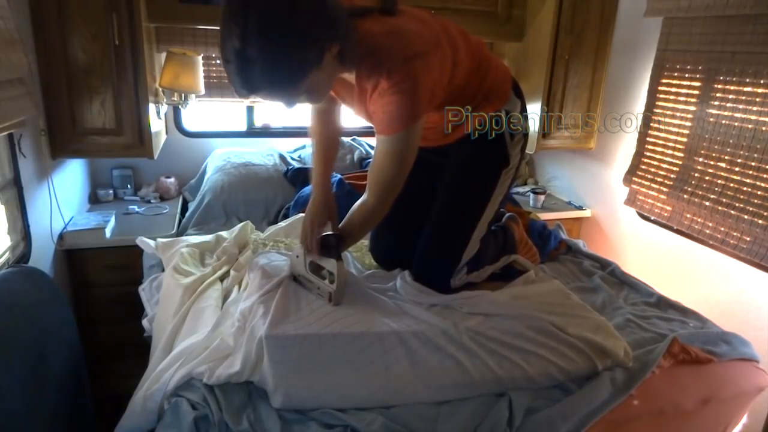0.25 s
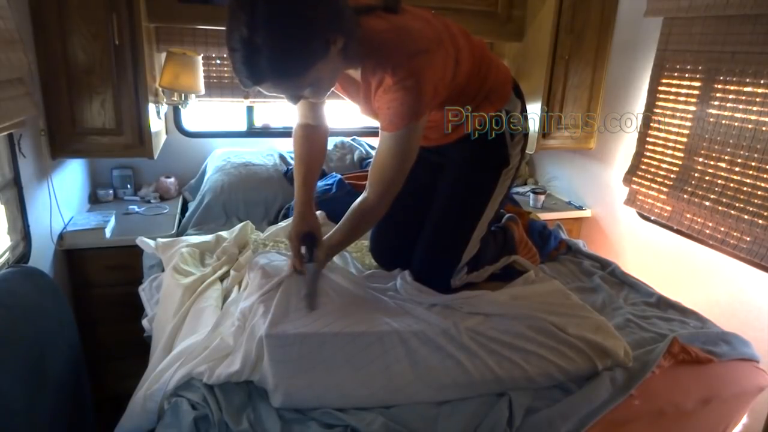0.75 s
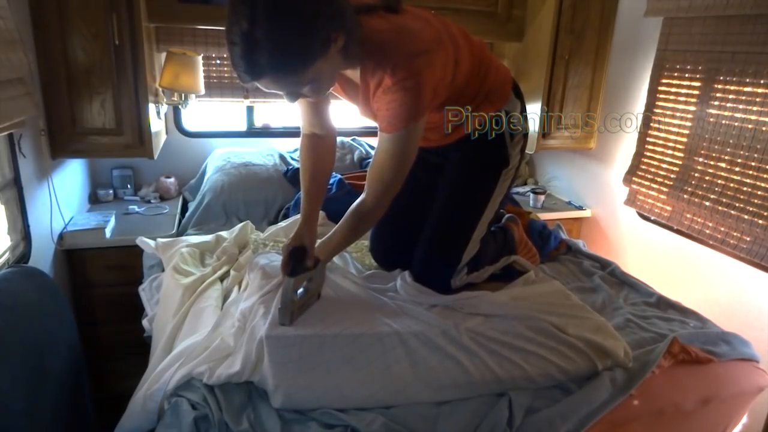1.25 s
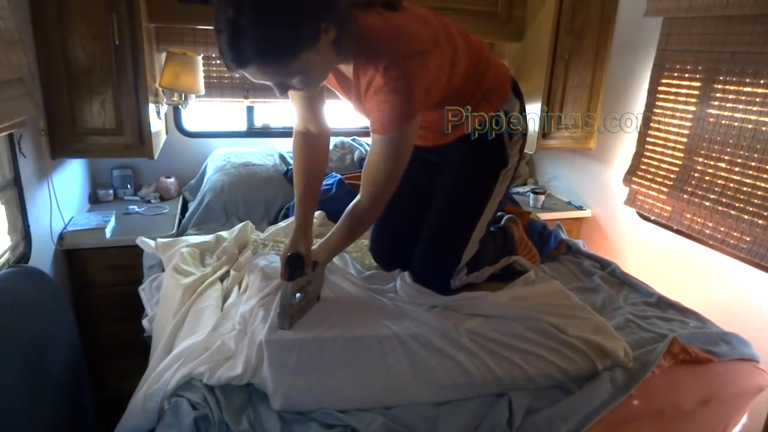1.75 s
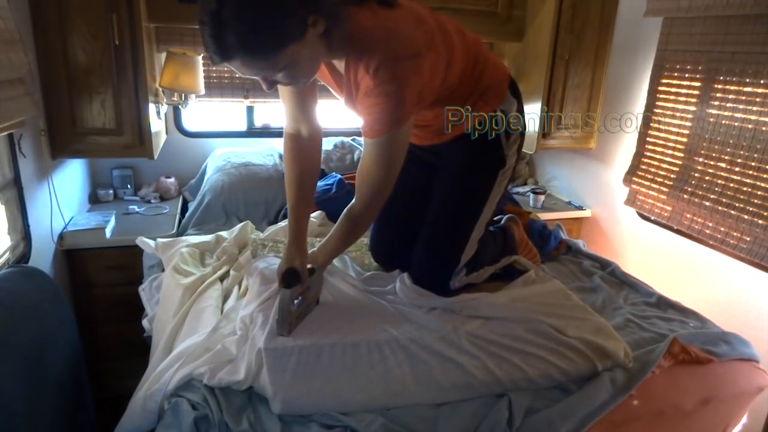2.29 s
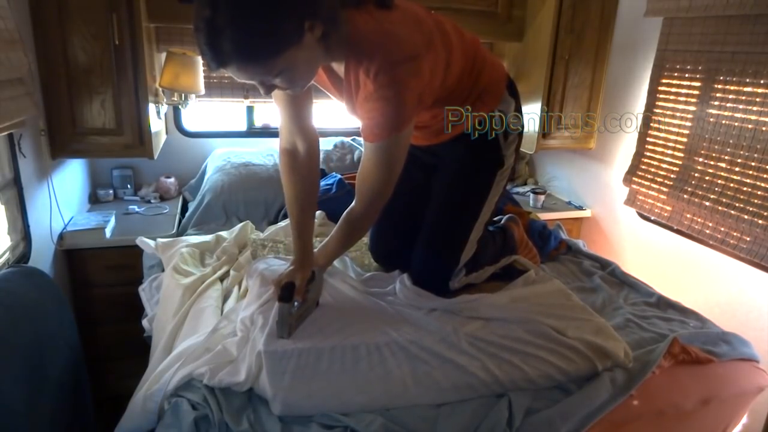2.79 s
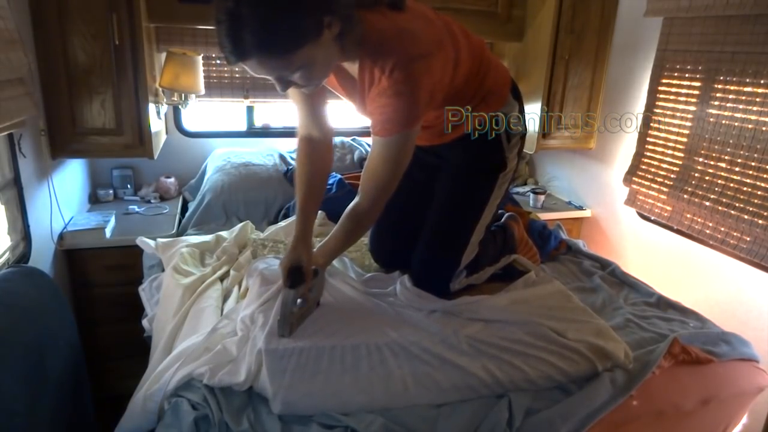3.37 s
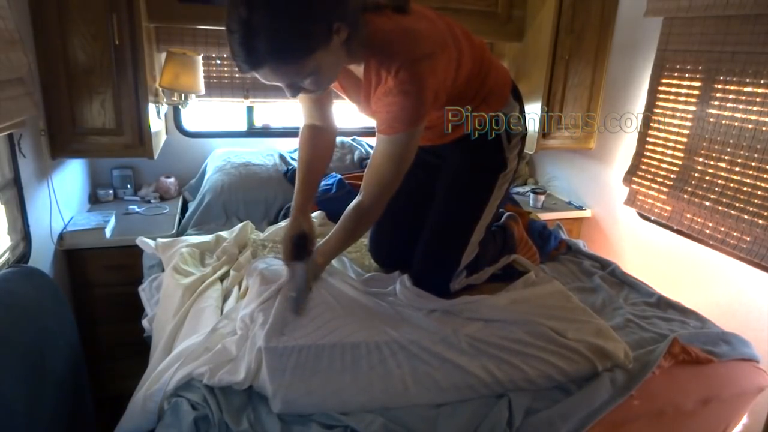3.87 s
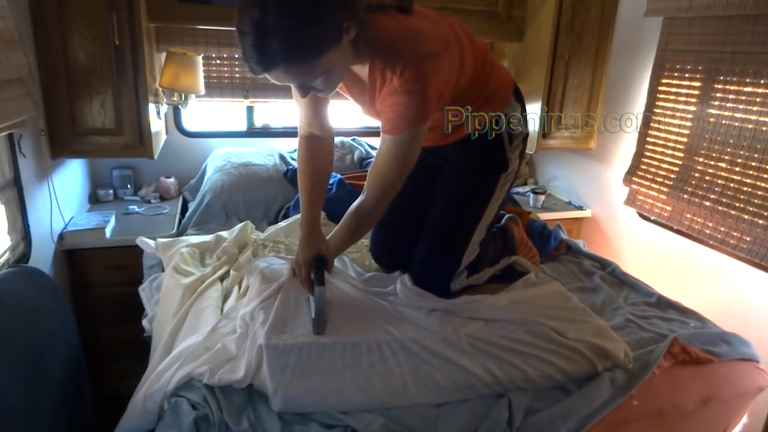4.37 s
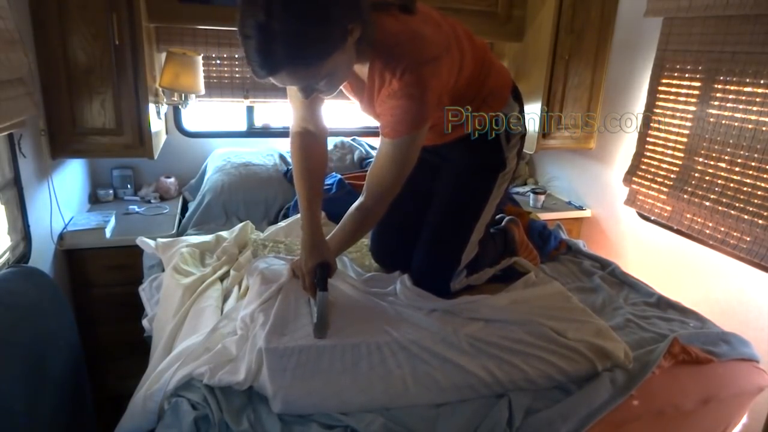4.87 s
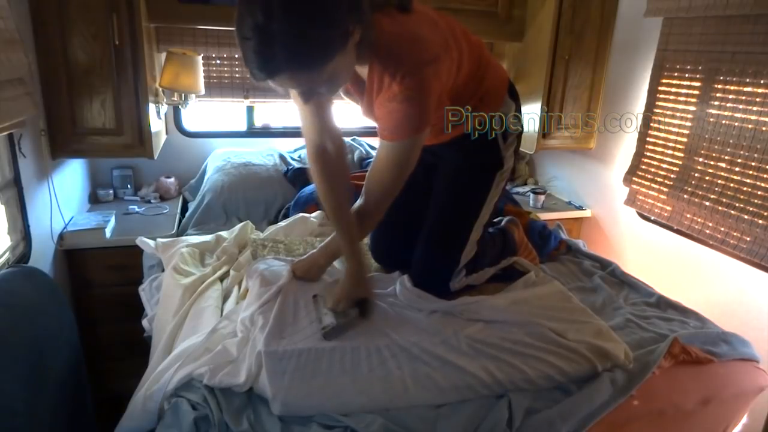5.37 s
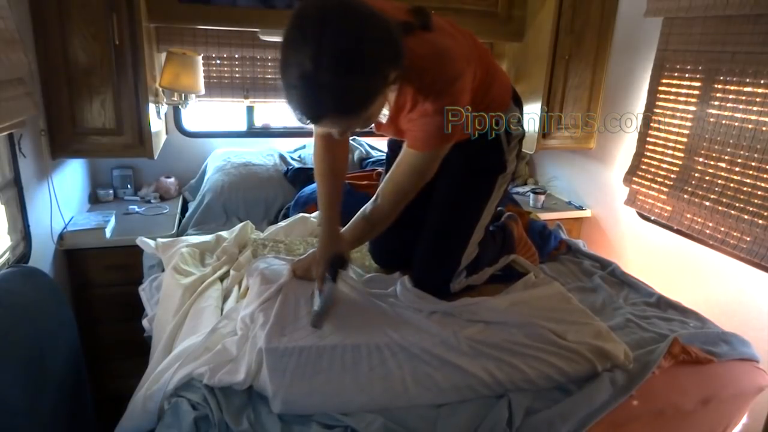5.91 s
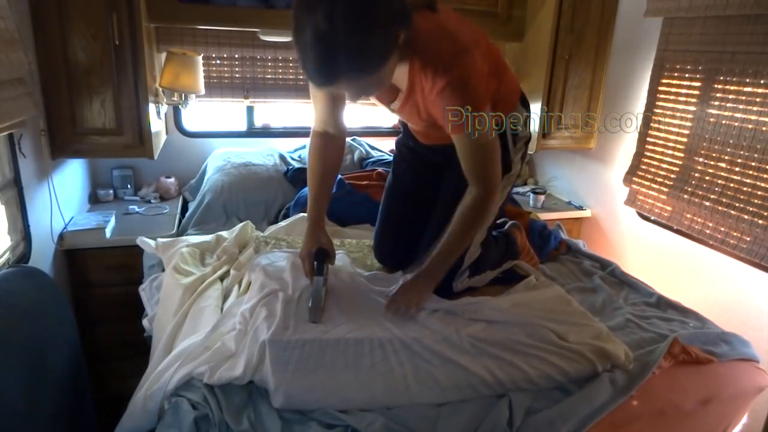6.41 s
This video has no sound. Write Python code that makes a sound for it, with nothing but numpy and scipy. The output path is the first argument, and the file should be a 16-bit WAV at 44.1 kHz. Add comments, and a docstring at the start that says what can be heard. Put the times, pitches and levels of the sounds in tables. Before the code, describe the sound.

An air conditioner runs throughout with a low, steady hum and a soft rush of air, in a small room with almost no echo. At about 0.5 seconds a hand staple gun is set on a padded board with a light, hollow knock and a faint brush of cloth. Its steel lever clacks at 2.4 and 2.7 seconds, and at 2.8 the gun fires: a loud, sharp snap with a brief metallic ring and a dull wooden thud. A quick cluster of clicks follows from 3.3 to 3.5 seconds as the lever is released. Only the hum remains until the lever clacks at 5.2 seconds and a second, slightly heavier shot lands at 5.3. Two more clacks and a small knock come between 5.4 and 5.7 seconds. Fabric rustles softly under a hand around 6.2 seconds. The gun sounds close and centred.

```python
"""Staple gun in a small, soft room

A hand staple gun fires twice through cloth into a padded board, whose modes thud under each blow.
Its steel lever clacks as it is squeezed and let go, its nose knocks on the board, and cloth rustles
by friction as the hands move on. An air conditioner hums and blows throughout; a limiter ducks
the hum under every loud snap."""
import sys
import numpy as np
from scipy import signal
from scipy.fft import rfft, irfft, next_fast_len
from scipy.io import wavfile
from scipy.ndimage import uniform_filter1d, minimum_filter1d, map_coordinates

SR = 44100
rng = np.random.default_rng(int(sys.argv[2]) if len(sys.argv) > 2 else 0)


def inscribe(sig):
    """Save sig as 16-bit PCM at rate SR to the path in sys.argv[1].

    A 1-D sig is mono; a 2-D sig holds one channel per row.
    Samples are clipped to [-1, 1] before scaling.
    """
    pcm = np.round(np.clip(np.atleast_2d(sig).T, -1, 1) * 32767)
    wavfile.write(sys.argv[1], SR, pcm.astype(np.int16))


N = 293265
BLOW_N = SR * 3 // 4
BLOW_T = np.arange(BLOW_N) / SR  # seconds since a blow


def amp(db):
    """Decibels as an amplitude ratio."""
    return 10 ** (np.asarray(db) / 20)


def unit(x):
    """Normalisation to rms 1."""
    return x / np.sqrt(np.mean(x ** 2) + 1e-20)


def along(points, hz):
    """Interpolation of (Hz, value) points on a logarithmic frequency axis."""
    freqs, values = np.transpose(points)
    return np.interp(np.log(hz + 1), np.log(freqs + 1), values)


def filtered(x, response):
    """Linear filtering: the spectrum is multiplied by a frequency response."""
    size = x.shape[-1]
    padded = next_fast_len(size + SR // 10)
    hz = np.fft.rfftfreq(padded, 1 / SR)
    return irfft(rfft(x, padded) * response(hz), padded)[..., :size]


def noise(spectrum, size):
    """Spectral shaping: white noise takes on a colour, at rms 1."""
    return unit(filtered(rng.standard_normal(size), lambda hz: amp(along(spectrum, hz))))


def resonant(peaks, size):
    """Forced resonance: noise drives (Hz, bandwidth Hz, dB) modes of alternating sign, at rms 1."""
    def response(f):
        return sum((-1) ** k * amp(db) * 1j * f * width / (hz * hz - f * f + 1j * f * width)
                   for k, (hz, width, db) in enumerate(peaks))
    return unit(filtered(rng.standard_normal(size), response))


def wobble(rate, size):
    """Random modulation: a smooth curve through `rate` values a second."""
    knots = rng.standard_normal(int(size * rate / SR) + 4)
    return map_coordinates(knots, [np.arange(size) * rate / SR])


def fade(t60, attack):
    """Exponential damping: a quick rise, and a fall of 60 dB in t60 seconds."""
    return np.exp(-np.log(1000) * BLOW_T / t60) * (1 - np.exp(-(BLOW_T / attack) ** 2))


def add(track, start, sound):
    """Superposition: a sound joins the track at `start` seconds."""
    part = track[:, round(start * SR):][:, :sound.shape[1]]
    part += sound[:, :part.shape[1]]


# Stereo width. Each row: frequency in Hz, gain of the side signal in dB.
SIDE_GAIN = [(50, -22), (130, -18), (300, -16), (600, -15), (1200, -18.5), (2200, -23), (3800, -29),
             (10000, -28)]

def spread(mid, side):
    """Spatial coherence: two close microphones receive nearly the same sound."""
    side = filtered(side, lambda hz: amp(along(SIDE_GAIN, hz)))
    return np.array([mid + side, mid - side])


# The room's absorption. Each row: frequency in Hz, reverberation time in seconds.
ROOM_DECAY = [(200, 0.14), (1500, 0.12), (5000, 0.12), (11000, 0.11)]

def in_room(x, wet_db):
    """Reverberation: convolution with a diffuse tail, new for every position of the gun."""
    hz, t, bands = signal.stft(rng.standard_normal((2, SR // 3)), SR, nperseg=256)
    decay = np.exp(-np.log(1000) * t / along(ROOM_DECAY, hz)[:, None])
    tail = signal.istft(bands * decay, SR, nperseg=256)[1]
    tail *= 1 - np.exp(-BLOW_T[:tail.shape[1]] / 0.00066)
    tail /= np.linalg.norm(tail[0])
    mid, side = signal.fftconvolve(x[None], tail, axes=1)[:, :len(x)]
    return spread(x + amp(wet_db) * mid, side)


# Fan shaft orders, mains buzz, panel tones and a thin whine. Each row: frequency in Hz, rms level in dB.
HUM_TONES = [(23.3, -51), (58.08, -22.7), (96.48, -43), (116.16, -31.5), (119.99, -24.6), (141, -37.5),
             (143.5, -37.5), (174.24, -38), (176.9, -43), (178.07, -43), (236.15, -42), (360, -49),
             (2961, -59), (3079, -65), (3311, -58)]

def hum():
    """Beating: the fan motor slips behind the mains, so its second order beats with the mains buzz."""
    t = np.arange(N) / SR - 0.998  # the tones swell together at 0.998 s
    right = np.array([[-1], [1]])
    out = np.zeros((2, N))
    for hz, db in HUM_TONES:
        drift = hz * 5e-5 * wobble(3, N)
        # the deep tones reach the right microphone a little stronger and sooner
        lean_db = min(1.3, 70 / hz)
        lead_rad = min(0.13, hz / 950)
        phase = 2 * np.pi * hz * t + drift + right * lead_rad
        out += np.sqrt(2) * amp(db + right * lean_db) * np.cos(phase)
    return out


# The blower's rumble and rush. Each row: frequency in Hz, relative spectral density in dB.
RUMBLE_SPECTRUM = [(15, -25), (35, -17), (55, -5), (75, -8), (115, 0), (150, -5), (200, -11), (300, -24),
                   (600, -60)]
RUSH_SPECTRUM = [(150, -18), (235, 1.5), (320, -1.5), (450, -4), (600, -8.5), (1000, -13), (1300, -18.5),
                 (1650, -21), (1950, -22), (3300, -27.5), (3800, -32), (8500, -42.5), (10700, -40),
                 (12000, -46)]
# The duct's resonances. Each row: frequency in Hz, bandwidth in Hz, relative level in dB.
DUCT_MODES = [(564, 9.4, 4), (693.3, 16.7, 0), (792, 24.6, 0), (898.4, 34, -0.5), (1049.6, 29, -1),
              (1192, 17, -4), (1587, 89, -11), (3130, 430, -25)]

def airflow():
    """Flow noise: the blower's air rumbles, rushes and excites the duct's resonances."""
    rumble = amp(-31.5) * noise(RUMBLE_SPECTRUM, N)
    rush = amp(-31) * noise(RUSH_SPECTRUM, N)
    duct = amp(-38) * resonant(DUCT_MODES, N)
    return rumble + rush + duct


# The gun's nose meets the board. Each row: start in seconds, level in dB, pitch in Hz,
# nominal bandwidth in Hz, 60 dB decay time in seconds.
NOSE_BUMPS = [(.474, -31.5, 1350, 40, 0.15), (.562, -21, 1340, 60, 0.074), (2.709, -20, 650, 160, 0.14),
              (3.537, -28.5, 1430, 200, 0.11), (5.453, -24.5, 2570, 250, 0.1)]

def nose_bumps():
    """Damped resonance: setting the nose down excites one narrow band, a short, hollow knock."""
    out = np.zeros((2, N))
    for start, db, hz, width, t60 in NOSE_BUMPS:
        mode = resonant([(hz, width, 0)], BLOW_N)
        log_width = 2 * width / hz + 0.046  # a bell curve trims the resonance's skirts
        band = filtered(mode, lambda f: np.exp(-(np.log((f + 1) / hz) / log_width) ** 2))
        knock = unit(band) * fade(t60, attack=0.00091)
        add(out, start, amp(db) * in_room(knock, wet_db=-10))
    return out


# The gun's frame and spring. Each row: frequency in Hz, relative level in dB,
# 60 dB decay time in seconds before scaling by `sustain`.
STEEL_MODES = [(2440, -4, 0.092), (3210, -14, 0.088), (4030, 1, 0.15), (4600, -30.5, 0.069),
               (5380, -8, 0.033), (6260, 12, 0.02), (6800, 17, 0.1), (7470, 24, 0.057), (9360, -10, 0.21),
               (8760, 8, 0.053), (9600, -20, .08), (10500, -17.5, 0.11), (10800, -37, .1),
               (11200, 21, 0.068)]

def steel_ring(sustain, blur_rad):
    """Free vibration: modes decay from new strengths at each blow; loose parts blur their phase."""
    out = 0
    for hz, db, t60 in STEEL_MODES:
        phase = 2 * np.pi * (hz * BLOW_T + rng.random()) + blur_rad * wobble(130, BLOW_N)
        strength = amp(db + rng.normal(0, 3.4))
        out += strength * np.sin(phase) * fade(t60 * sustain, attack=0.00023)
    return out / np.linalg.norm(amp([db for _, db, _ in STEEL_MODES]))


# A steel contact's crack and hollow body. Each row: frequency in Hz, relative spectral density in dB.
CRACK_SPECTRUM = [(200, -34), (1000, 2.5), (2500, -8), (4000, 4.5), (5500, 9), (7500, 6.5), (9000, 6),
                  (10700, 9.5), (12000, 2), (14000, -27)]
BODY_SPECTRUM = [(150, -22), (500, -7), (1400, -2), (2400, 0), (3500, -3), (6000, -16), (12000, -40)]
# Contacts of lever and catch. Each row: start in seconds, overall gain in dB, body gain in dB,
# ring gain in dB, centre of the bright band in Hz, relative level of the first touch in dB.
LEVER_CLACKS = [(.486, -41, 0, -10, 7000, -14), (0.558, -38, 6.5, -17, 6500, -30),
                (1.478, -42.5, -8, -15, 5370, -20), (1.865, -42.5, -5, -14, 9000, -20),
                (2.106, -46, -8, -13, 10000, -20), (2.415, -13.5, -4, -21, 3470, -24),
                (2.707, -10, -8, -16, 7240, -26), (3.337, -17, 0, -21, 10700, -21),
                (3.425, -15.5, -0.5, -2, 8300, -20), (3.472, -23.5, -5, -7, 10600, -16),
                (3.528, -10.5, -9, -18, 5450, -39), (5.198, -12, -8, -22, 10100, -34),
                (5.283, -15, -5, -22, 3270, -18), (5.451, -12.5, -4.5, -7, 10700, -35),
                (5.649, -17, -3.5, -1, 7100, -13), (5.75, -32, -12, -12, 8240, -25)]

def lever():
    """Backlash: steel parts touch lightly, take up their play, then meet with a crack and a ring."""
    play_s = 0.009
    out = np.zeros((2, N))
    for start, db, body_db, ring_db, bright_hz, touch_db in LEVER_CLACKS:
        crack = noise(CRACK_SPECTRUM, BLOW_N)
        body = amp(body_db) * noise(BODY_SPECTRUM, BLOW_N)
        bright = amp(-5.5) * resonant([(bright_hz, 600, 0)], BLOW_N)
        contact = amp(8.5) * (crack + body + bright) * fade(t60=0.025, attack=0.0037)
        ring = amp(ring_db) * steel_ring(sustain=0.64, blur_rad=0.37)
        clack = amp(db) * in_room(contact + ring, wet_db=-4)
        add(out, start - play_s, amp(touch_db) * clack)
        add(out, start, clack)
    return out


# Sliding fabric. Each row: frequency in Hz, relative spectral density in dB.
RUSTLE_SPECTRUM = [(400, -22), (2000, 0), (4000, -3.5), (7000, -3.5), (9000, -6), (12000, -5)]
# A hand strokes the cloth. Each row: time of fastest slide in seconds, level in dB,
# seconds to swell by 20 dB, seconds to settle by 20 dB.
HAND_STROKES = [(.675, -45, .11, .08), (5.59, -44.5, 0.086, 0.13), (6.125, -43, 0.062, 0.072),
                (6.2, -36.5, 0.14, 0.16), (6.6, -49, .1, .18)]

def cloth():
    """Sliding friction: each stroke swells and settles while the fabric grips in small, uneven catches."""
    t = np.arange(N) / SR
    strokes = sum(amp(db - 20 * np.maximum((peak - t) / swell, (t - peak) / settle))
                  for peak, db, swell, settle in HAND_STROKES)
    grip_db = 2 * wobble(rate=240, size=N)
    slide = strokes * amp(grip_db) * noise(RUSTLE_SPECTRUM, N)
    return spread(slide, np.roll(slide, SR // 100))


# The driver's snap. Each row: frequency in Hz, relative spectral density in dB.
SNAP_SPECTRUM = [(150, -71), (600, -4.5), (1600, 2), (2500, 1), (4000, 1.5), (6000, -0.5), (8500, 1),
                 (10500, 6.5), (11800, 5.5), (14000, 1.5)]
# The driver strikes a staple home. Each row: start in seconds, gain in dB.
STAPLE_SHOTS = [(2.7895, 5), (5.304, 8)]

def staples():
    """Impact excitation: the spring slams the driver down, the frame rings and loose steel sizzles."""
    out = np.zeros((2, N))
    for start, db in STAPLE_SHOTS:
        crack = noise(SNAP_SPECTRUM, BLOW_N) * fade(t60=0.086, attack=0.0028)
        frame = amp(-14) * steel_ring(sustain=1.2, blur_rad=1.1)
        sizzle = amp(-39) * noise(CRACK_SPECTRUM, BLOW_N) * fade(t60=0.52, attack=0.01)
        add(out, start, amp(db) * in_room(crack + frame + sizzle, wet_db=-1))
    return out


# The board under the cloth. Each row: frequency in Hz, bandwidth in Hz, relative level in dB.
BOARD_MODES = [(170, 90, -3), (300, 70, -1), (460, 80, 2), (585, 45, 4), (690, 30, 3), (950, 160, -9),
               (1420, 50, -4), (1500, 50, -1), (1640, 140, -6)]
# The board takes the blow and the gun rebounds on it. Each row: start in seconds, level in dB,
# spectral tilt in dB per octave, 60 dB decay time in seconds.
BOARD_THUDS = [(2.794, 1, 2, 0.058), (2.810, -4.5, -4.5, 0.062), (5.306, 1, 5, 0.092),
               (5.319, 5.5, -0.5, 0.06), (5.355, -10.5, -6.5, 0.071)]

def board():
    """Modal response: the padded board thuds, and softer blows excite its upper modes less."""
    out = np.zeros((2, N))
    for start, db, tilt, t60 in BOARD_THUDS:
        modes = resonant(BOARD_MODES, BLOW_N)
        wood = filtered(modes, lambda hz: amp(tilt * np.log2(np.clip(hz, 100, 2000) / 500)))
        thud = unit(wood) * fade(t60, attack=0.003)
        add(out, start, amp(db) * in_room(thud, wet_db=-3))
    return out


def scene():
    """Superposition: the pressures of air conditioner, gun, cloth and board add."""
    air_conditioner = hum() + spread(airflow(), airflow())
    return air_conditioner + nose_bumps() + lever() + cloth() + staples() + board()


def limiter(x, ceiling_db, hold_s):
    """Look-ahead limiting: the gain falls a millisecond before each peak and recovers soon after."""
    ahead = SR // 1000
    hold = max(int(hold_s * SR), 3 * ahead)
    peak_db = 20 * np.log10(np.abs(x).max(axis=0) + 1e-9)
    gain_db = np.minimum(0, ceiling_db - peak_db)
    held_db = minimum_filter1d(gain_db, hold, origin=(hold - 1) // 2 - ahead)
    return x * amp(uniform_filter1d(held_db, size=2 * ahead))


def record(dry):
    """Peak and band limiting: the snaps are held down, then a steep low-pass cuts the top treble."""
    cutoff_hz = 12050
    limited = limiter(dry, ceiling_db=-4.5, hold_s=0.0045)
    return filtered(limited, lambda hz: 1 / np.sqrt(1 + (hz / cutoff_hz) ** 160))


dry = scene()
out = record(dry)
inscribe(out)
```